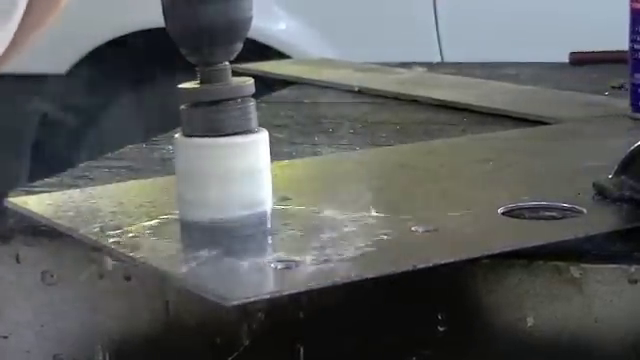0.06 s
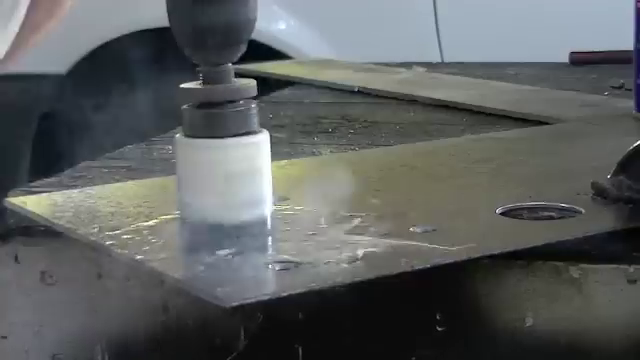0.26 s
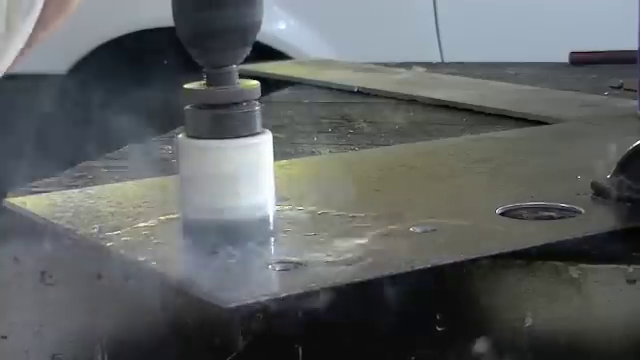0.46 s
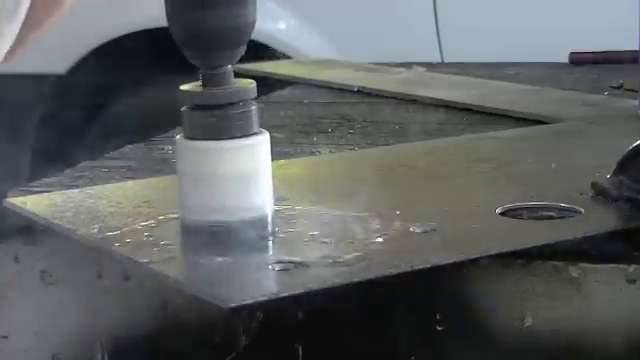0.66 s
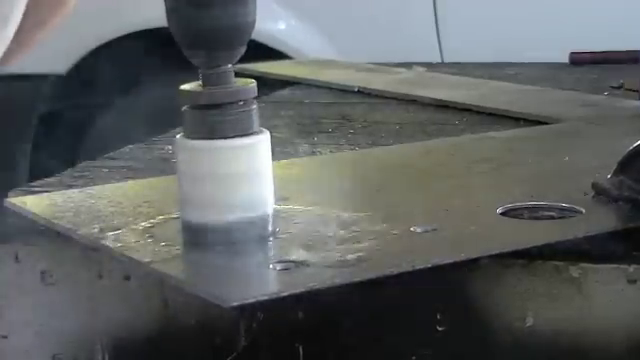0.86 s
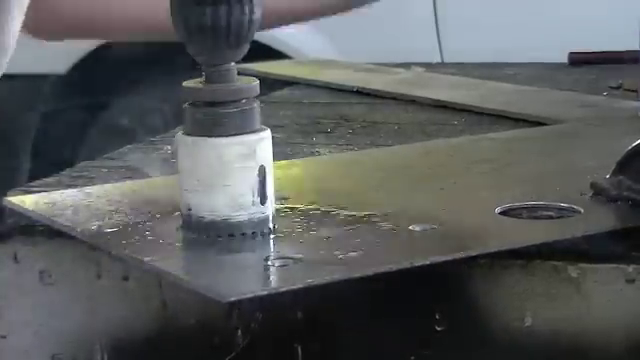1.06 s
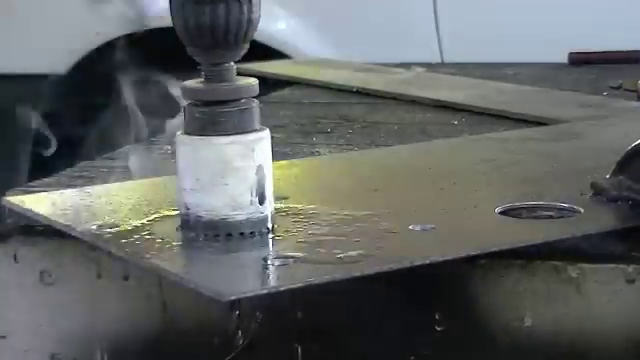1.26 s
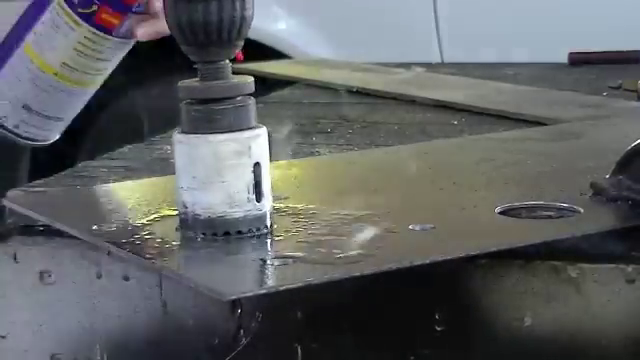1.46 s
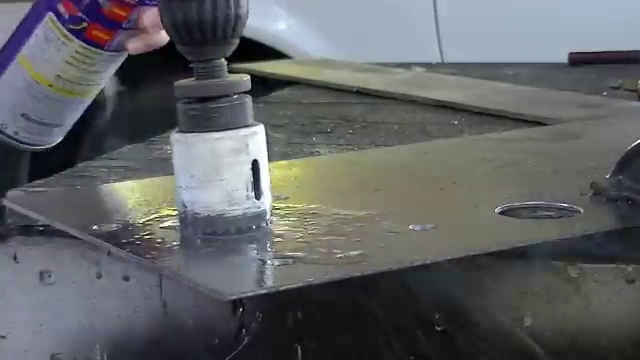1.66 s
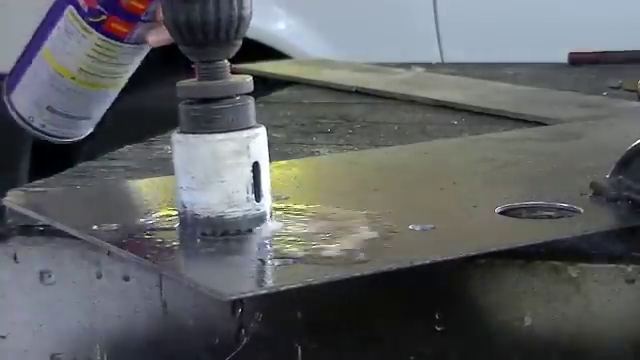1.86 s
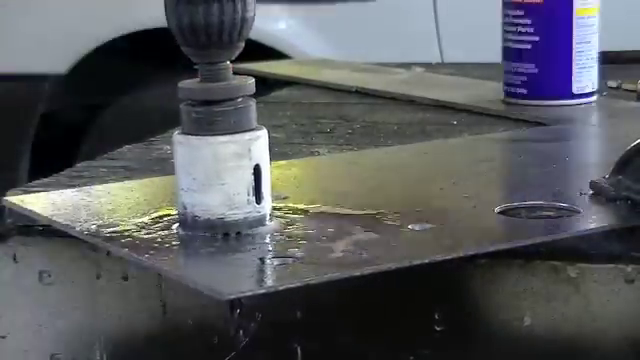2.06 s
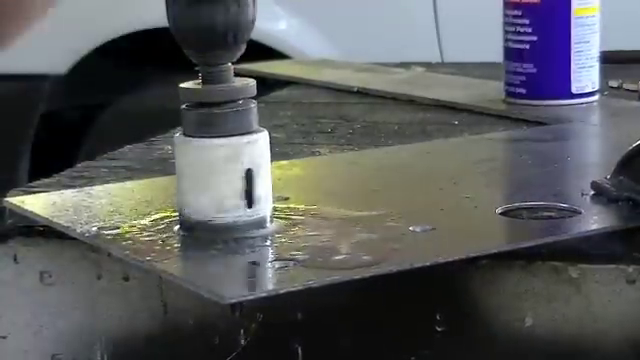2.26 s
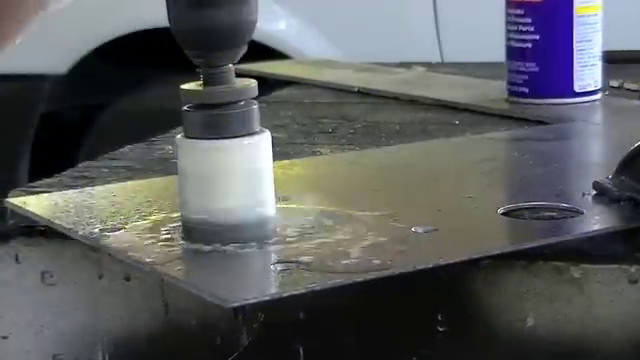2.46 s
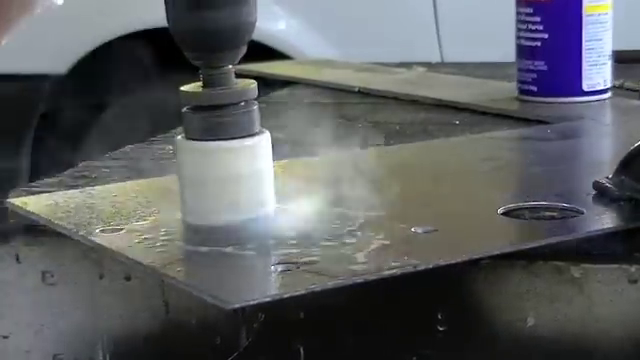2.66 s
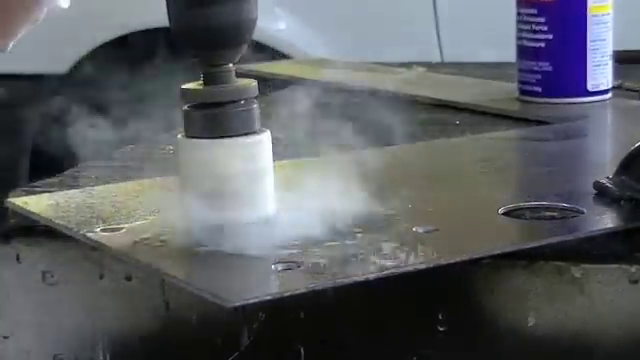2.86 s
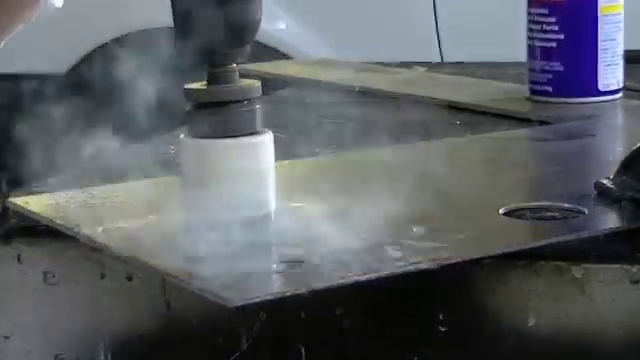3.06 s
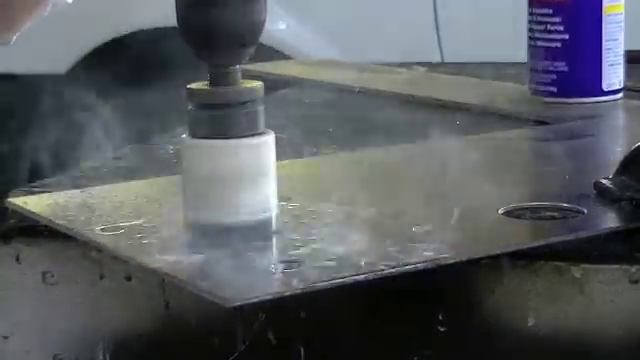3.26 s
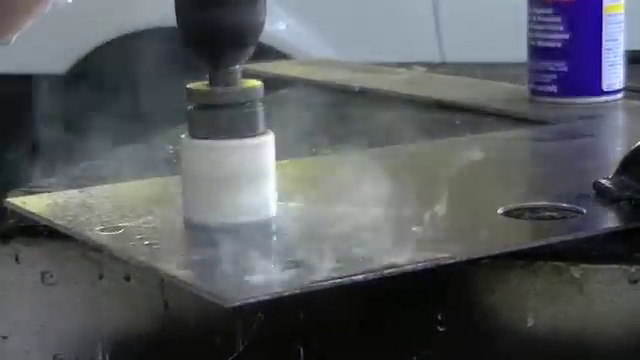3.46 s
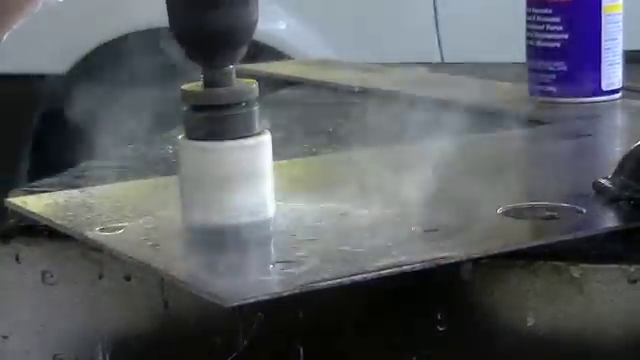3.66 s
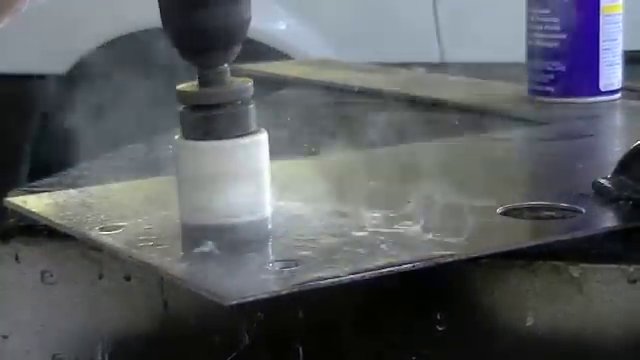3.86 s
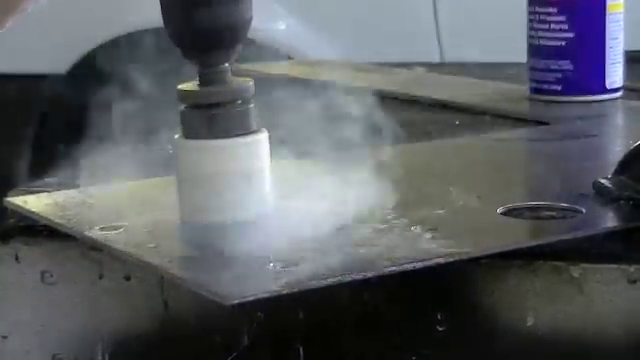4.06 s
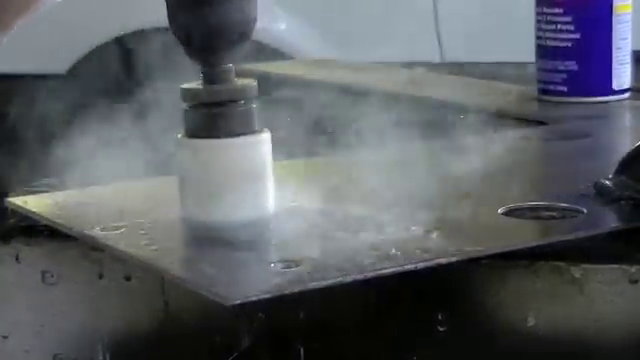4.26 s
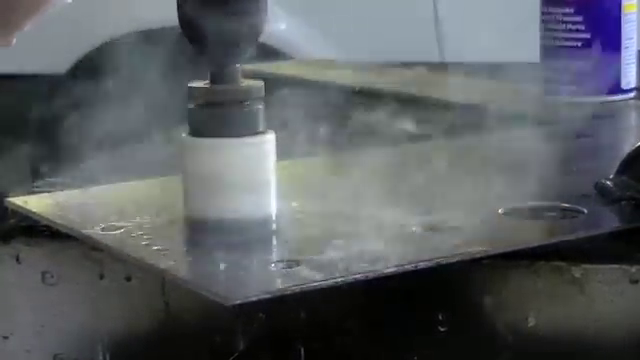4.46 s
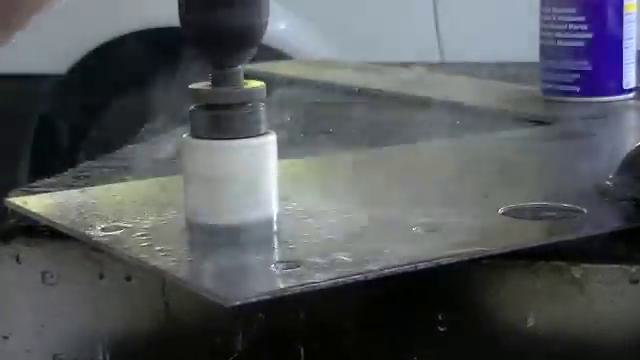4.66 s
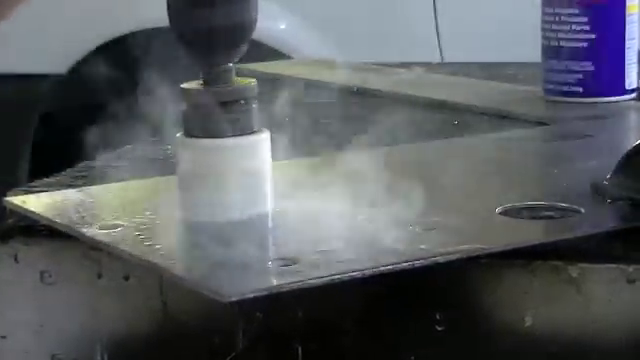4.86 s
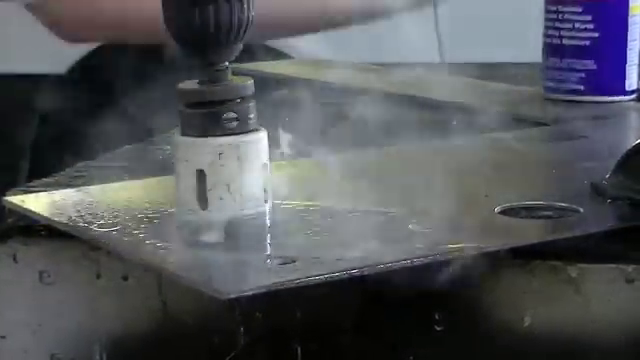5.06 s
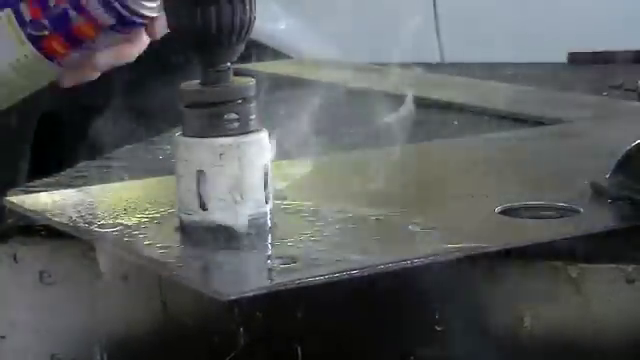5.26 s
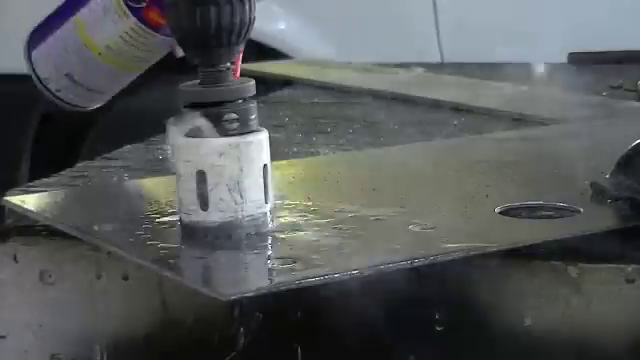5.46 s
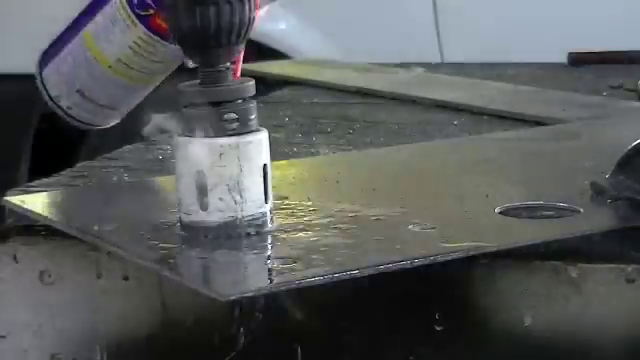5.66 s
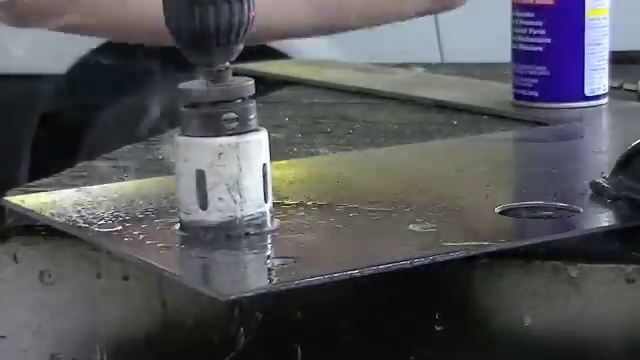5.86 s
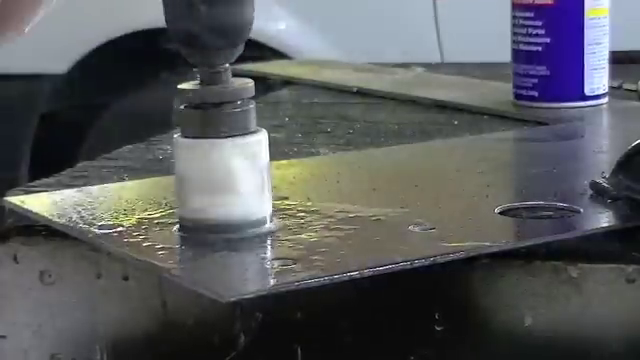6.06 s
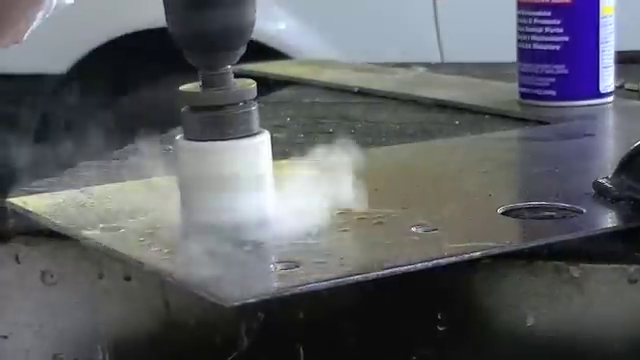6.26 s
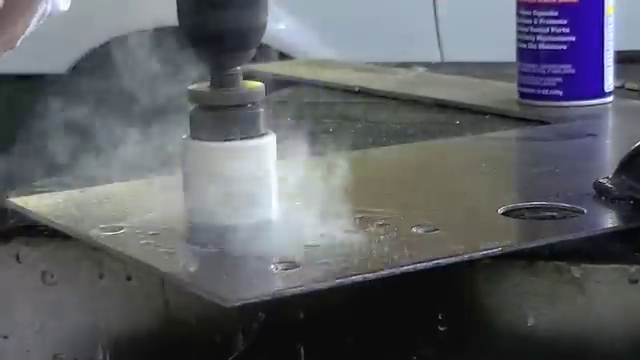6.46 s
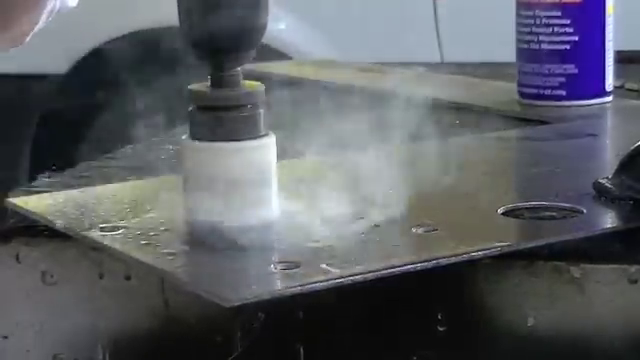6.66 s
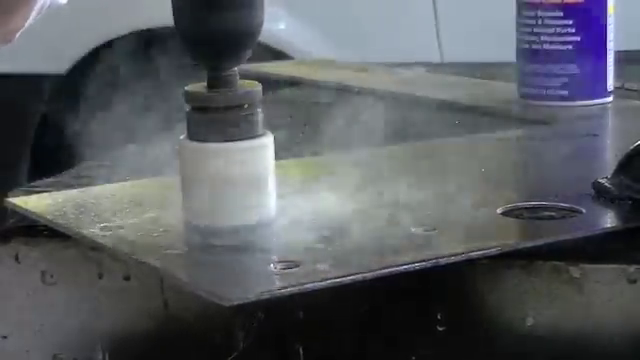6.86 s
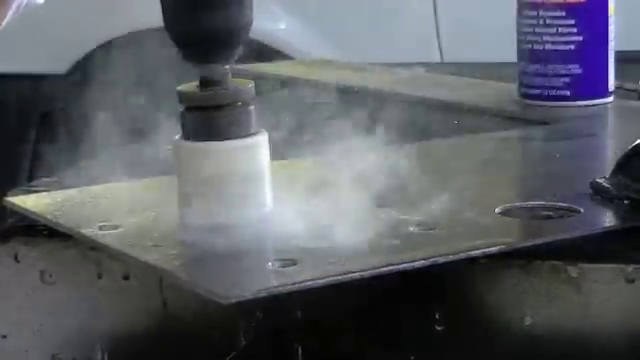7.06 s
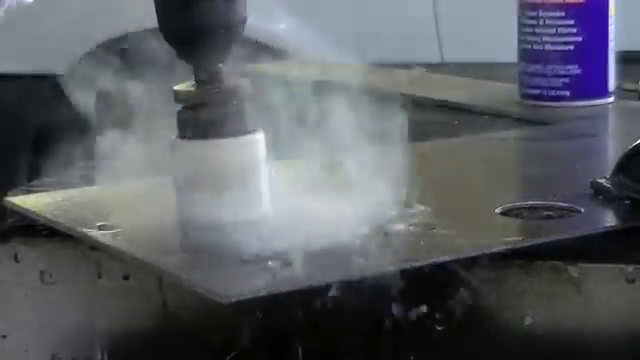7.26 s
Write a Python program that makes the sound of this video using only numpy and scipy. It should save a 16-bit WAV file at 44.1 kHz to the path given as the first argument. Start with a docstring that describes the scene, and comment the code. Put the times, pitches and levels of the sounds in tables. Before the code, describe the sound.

Close up in a workshop, a drill-driven hole saw grinds a steel plate with harsh, shrill, uneven chatter. It stops after a second; a can clacks, spray hisses and oil spits faintly, a distant motor whines upward. A sharp clank, then a longer cutting burst. Another pause with spray and a hard clack, then cutting resumes to the end. Automatic level control lifts the background in the gaps.

```python
"""Three bursts of harsh chatter: a hand drill drives a hole saw into a steel plate.
Uneven tooth strikes, faster or slower with the load, ring the resonances of cup and plate.
In the pauses a spray can is handled and set down (noise bursts with decaying modes) and hisses (gated noise).
Behind lie shop air, a machine's hum and a brief motor whine (noise and sines);
they come up in the pauses because a gain control lets go."""
import sys
import numpy as np
from scipy import signal
from scipy.fft import rfft, irfft, next_fast_len
from scipy.io import wavfile
from scipy.ndimage import uniform_filter1d, map_coordinates

SR = 44100
rng = np.random.default_rng(int(sys.argv[2]) if len(sys.argv) > 2 else 0)


def unload_audio(sound):
    """Save the sound as a 16-bit wav file, at the path given as the first command line argument."""
    columns = np.transpose(np.atleast_2d(sound))
    # keep every value between -1 and 1, then stretch to whole-number steps
    steps = np.round(np.clip(columns, -1, 1) * 32767)
    wavfile.write(sys.argv[1], SR, steps.astype(np.int16))


N = 321930


def saw():
    """Unevenly spaced tooth strikes ring the steel: dark below the strike rate, noise above its first multiples."""
    # Saw cup and plate resonances. Each row: centre in Hz, width in Hz, relative level in dB.
    steel_modes = [(1240, 60, -12), (1700, 26, -1), (2070, 68, -6), (2400, 83, -12), (3410, 140, -2),
                   (3930, 130, -3), (4840, 80, 0), (5070, 60, -1), (5770, 110, -4), (6560, 120, -3),
                   (7020, 50, -2), (7400, 120, -1), (7620, 67, -3), (8140, 94, -3), (8800, 130, -1),
                   (9140, 120, -4), (9400, 150, -4), (9980, 200, -5), (10500, 110, -5), (11110, 90, -2),
                   (11810, 60, -4), (12400, 110, -5), (13140, 150, -5), (13850, 130, -5), (14500, 600, -7),
                   (15300, 900, -5)]
    # The plate's many small modes, blurred. Each row: frequency in Hz, relative level in dB.
    plate_blur = [(60, -67), (300, -37), (700, -17.5), (1400, -13.5), (2200, -14), (3000, -9), (5000, -3),
                  (8000, -3), (12000, -4.5), (14300, -14), (15700, -33)]
    rate_hz, level_db, throb_db = cut()
    strikes = tooth_strikes(rate_hz, level_db, throb_db)

    def steel(hz):
        cup_power = sum(amp(db + 2.0) ** 2 / (1 + (2 * (hz - c) / w) ** 2) for c, w, db in steel_modes)
        plate_power = amp(along(plate_blur, hz)) ** 2
        return causal(np.sqrt(cup_power + plate_power)) * spread(hz)

    ring = filtered(strikes, steel)
    # the turning cup and deepening cut keep changing which modes are driven
    ring = shifting(ring, depth_db=3.0)
    power = uniform_filter1d(uniform_filter1d(ring ** 2, size=4000), size=4000)
    loudness = np.sqrt(np.abs(power) + 1e-9)
    return amp(level_db) * ring / loudness


def cut():
    """Strike rate, level and throb of the saw; the level falls after a burst and rises again at the next bite."""
    # Three bursts, from the bite of the teeth to standstill. Each row: time in seconds,
    # tooth strikes per second, level in dB ahead of the gain control, throb scale in dB.
    cut_bursts = [
        [(0, 3160, 13, 6), (.17, 2970, 9.5, 9.5), (.4, 2170, 8, 10.5), (.5, 3280, 7, 8.5), (.62, 3160, 5, 6.5),
         (.8, 2800, 8.5, 9), (.95, 2240, 9, 6), (1.0, 2400, 6.5, 3.5), (1.04, 2070, -3.5, 4)],
        [(2.35, 1440, 4.5, 8), (2.4, 1830, 7.5, 2), (2.435, 2350, 14.5, 6.5), (2.47, 2460, 20.5, 9),
         (2.49, 1940, 18.5, 8.5), (2.68, 2400, 10.5, 7), (2.78, 2200, 12, 3.5), (2.91, 1740, 12, 3),
         (3.03, 2020, 11.5, 3.5), (3.18, 2750, 12.5, 9), (3.35, 3590, 6.5, 8), (3.57, 3460, 5, 8),
         (3.73, 2150, 4.5, 9), (3.95, 2660, 5, 10), (4.1, 1850, 8.5, 8), (4.3, 1680, 11, 5.5),
         (4.37, 1700, 9.5, 1.5), (4.46, 3100, 8.5, 9.5), (4.78, 3730, 5, 8), (4.91, 1850, 5.5, 7),
         (5.02, 950, 0.5, 5), (5.11, 770, -6.5, 3.5)],
        [(6.13, 1600, 10, 7), (6.18, 1890, 14, 4), (6.4, 2050, 14.5, 3.5), (6.48, 3520, 12.5, 8),
         (6.6, 3990, 13, 5), (6.86, 3640, 12, 6), (6.96, 2840, 10.5, 7.5), (7.2, 1750, 15, 7),
         (7.3, 1550, 12.5, 7)],
    ]
    bite_db_per_s, fade_db_per_s = 1905, 503
    t = np.arange(N) / SR
    rate_hz, level_db, throb_db = curves(sum(cut_bursts, []))
    quiet_db = []
    for rows in cut_bursts:
        before_s = np.maximum(rows[0][0] - t, 0)
        after_s = np.maximum(t - rows[-1][0], 0)
        quiet_db.append(bite_db_per_s * before_s + fade_db_per_s * after_s)
    return rate_hz, level_db - np.min(quiet_db, axis=0), throb_db


def tooth_strikes(rate_hz, level_db, throb_db):
    """Impulses at drifting, scattered times, their force throbbing as the saw runs out of true."""
    throb_hz = 52
    uneven_firm, uneven_per_db, firm_db = .13, .004, 8.5  # spacing is less even below a firm cut's level
    uneven = np.clip(uneven_firm + uneven_per_db * np.maximum(firm_db - level_db, 0), 0, .4)
    count = np.cumsum(rate_hz) / SR
    chance = rng.standard_normal((N // 5, 3))
    tooth = np.arange(len(chance))
    scatter = np.interp(tooth, count, uneven)
    shake_db = np.interp(tooth, count, throb_db)
    # the beat drifts, more so while the saw throbs, and each tooth also lands early or late against it
    drift = uniform_filter1d(chance[:, 0], size=3)  # the cup's mass spreads each change over a few teeth
    beat = np.cumsum(1 + .55 * amp(1.3 * shake_db) * scatter * drift)
    beat = beat + 0.62 * scatter * chance[:, 2]
    at = np.interp(beat, count, np.arange(N))
    # once a turn the high tooth bites hard, then the force fades
    turn = (np.cumsum(throb_hz * (1 + 0.044 * wobble(20))) / SR) % 1
    throb = throb_db * (.8 + 0.25 * wobble(45)) * (np.exp(-2.5 * turn) - .37)
    force = amp(throb + .8 * wobble(6))
    force = uniform_filter1d(force, size=90)  # the bite takes two milliseconds
    size = np.interp(at, np.arange(N), force) * amp(.35 * chance[:, 1])
    size = size * (beat < count[-1])
    # windowed sinc places each strike between samples
    taps = np.floor(at)[:, None] + np.arange(-7, 9)
    offset = taps - at[:, None]
    shape = np.sinc(offset) * np.cos(np.pi * offset / 18) ** 2
    index = np.clip(taps, 0, N - 1).astype(int)
    return np.bincount(index.ravel(), (size[:, None] * shape).ravel(), N)


def spread(hz):
    """Bending waves cross the plate on many paths: each band gets its own lag, smeared without colouring."""
    longest_lag_s, band_hz = .006, 150
    lag_s = longest_lag_s * np.interp(hz / band_hz, np.arange(400), rng.random(400))
    return np.exp(-2j * np.pi * np.cumsum(lag_s) * hz[1])


def shifting(x, depth_db):
    """x under patches of random gain that drift in time and frequency."""
    z = signal.stft(x, nperseg=512)[2]
    field = uniform_filter1d(rng.standard_normal(z.shape), size=2, axis=0)
    field = uniform_filter1d(field, size=30, axis=1)
    return signal.istft(z * amp(depth_db * unit(field)), nperseg=512)[1][:N]


def clacks():
    """Can and metal clacks: a bright burst dies away while the can's modes ring on."""
    # Each row: start in seconds, relative burst level in dB, burst t60 in seconds,
    # brightness in dB per octave, body ring level in dB, base ring level in dB.
    clack_rows = [(1.1561, -33, 0.41, -6.5, -56, -43), (1.2067, -17.5, 0.097, -0.5, -40, -36),
                  (1.2494, -35, 0.22, 1, -60, -50), (1.3219, -17, 0.11, 0, -62, -37),
                  (2.057, -26, 0.074, 6, -57, -57), (2.1026, -8, 0.17, -1, -31, -25),
                  (2.1615, -15, 0.031, -2.5, -34.5, -50), (2.2186, -31.5, 0.13, -2.5, -54, -60),
                  (2.2777, -24, 0.12, 1, -52, -58), (5.1548, -21, 0.12, -7.5, -32.5, -33),
                  (5.8988, -3.5, 0.11, -1.3, -35, -29), (6.0406, -20.5, 0.095, -5, -54, -62)]
    # The can's modes: those struck with the burst, then body, then base.
    # Each row: frequency in Hz, relative level in dB, t60 in seconds (struck modes also fade with the burst).
    struck_modes = [(1800, -2, 0.17), (4140, -7.5, 0.22), (4700, 4, 0.031), (5850, 7.5, 0.035),
                    (7340, -1, 0.16), (7840, 3, 0.1), (11300, -25, 0.081)]
    body_modes = [(650, 3, .15), (710, -2, .06)]
    base_modes = [(1172, 0, .09), (1250, 0, .15)]
    out = np.zeros(N + SR)
    t = np.arange(SR // 4) / SR
    hz = np.fft.rfftfreq(len(t), 1 / SR)

    def ring(modes):
        return sum(amp(db + rng.normal(0, 3) - 60 * t / t60_s) * np.sin(2 * np.pi * f * t)
                   for f, db, t60_s in modes)

    for start_s, db, t60_s, tilt_db, body_db, base_db in clack_rows:
        t60_s = max(t60_s, .01)
        colour = amp(tilt_db * np.log2((hz + 1) / 5000)) / (1 + (1300 / (hz + 1)) ** 4)
        burst = unit(irfft(rfft(rng.standard_normal(len(t))) * colour, len(t)))
        burst = burst * (amp(-60 * t / t60_s) + 0.53 * amp(-60 * t / 0.011))
        struck = ring(struck_modes) * amp(-30 * t / t60_s)
        hit = amp(db) * (0.6 * burst + 0.14 * struck)
        hit = hit + amp(body_db) * ring(body_modes) + amp(base_db) * ring(base_modes)
        out[round(start_s * SR):][:len(t)] += hit * (1 - np.exp(-t / 0.0012))
    return smear(out[:N], t60_s=0.72, wet_db=-36)


def spray():
    """Nozzle hiss in puffs and longer faint squirts; oil spitting on the hot saw is grainy treble noise."""
    # Nozzle openings and oil spits. Each row: start in seconds, level in dB, length in seconds.
    nozzle = [(1.438, -30.5, 0.0057), (1.4625, -19, 0.012), (1.586, -41, 0.38), (2.038, -31.5, .015),
              (5.318, -43, 0.21), (5.712, -41.5, 0.025), (6.082, -32, 0.012)]
    spits = [(1.598, -40, 0.038), (1.672, -36.5, 0.026), (1.71, -45, 0.025), (1.787, -39, 0.014),
             (1.918, -43.5, 0.013), (5.314, -43, 0.015), (5.41, -42, 0.02), (5.482, -38.5, 0.012)]
    # Spectra of nozzle and oil. Each row: frequency in Hz, relative level in dB.
    hiss = [(300, -39), (2000, -9), (5000, -6), (9000, -5), (15000, -4)]
    sizzle = [(300, -70), (3000, -59), (5200, -21), (6600, -16.5), (8000, -20.5), (11000, -31)]
    grains = unit(noise(sizzle) * amp(0.86 * wobble(140)))
    return bursts(nozzle, t60_s=0.095) * noise(hiss) + bursts(spits, t60_s=0.13) * grains


def bursts(rows, t60_s):
    """Gain of sudden, held and fading bursts."""
    t = np.arange(N) / SR
    gain = 0
    for start_s, db, length_s in rows:
        fade_db = 60 * np.maximum(t - start_s - length_s, 0) / t60_s
        gain = gain + amp(db - fade_db) * np.clip((t - start_s) / 0.0018 + 1, 0, 1)
    return gain


def workshop():
    """Near-steady air noise, an idling machine's unsteady harmonics and a passing whine; the air has some width."""
    # Workshop air. Each row: time in seconds, level in dB.
    shop_level = [(1.2, -43), (2.3, -41.5), (5.4, -42), (5.75, -39.5), (6.0, -41.5)]
    # Air spectrum. Each row: frequency in Hz, relative level in dB.
    air_spectrum = [(30, -29), (110, -17), (170, -11), (300, -7), (460, -4), (700, -4), (1300, -8),
                    (1900, -11.5), (4400, -14.5), (8000, -20.5), (15500, -29.5)]
    # A machine idling. Each row: multiple of hum_hz, level in dB.
    hum_tones = [(7, -61), (8, -59), (9, -59.5), (11, -49.5), (12, -59.5), (16, -61)]
    hum_hz = 43.13
    # A far motor winds up and sags. Each row: time in seconds, frequency in Hz, level in dB.
    whine_path = [(1.12, 425, -60), (1.45, 510, -48.5), (1.87, 593, -48), (2.02, 560, -70)]
    t = np.arange(N) / SR
    air_db, = curves(shop_level)
    air = amp(air_db + wobble(8)) * noise(air_spectrum)
    hum = 0
    for k, db in hum_tones:
        level = amp(db + 0.46 * wobble(54)) * np.sqrt(2)
        hum = hum + level * np.sin(2 * np.pi * k * hum_hz * t + 1.46 * wobble(11))
    whine_hz, whine_db = curves(whine_path)
    whine_db[(t < whine_path[0][0]) | (t > whine_path[-1][0])] = -120
    whine_phase = 2 * np.pi * np.cumsum(whine_hz) / SR
    whine = amp(whine_db + 2.3 * wobble(9.7)) * np.sqrt(2) * np.sin(whine_phase)
    side = amp(air_db - 28.0) * noise([(60, -10), (400, 2), (1000, -10), (3000, -22)])
    return air + hum + whine + np.array([side, -side])


def amp(db):
    """dB to gain."""
    return 10 ** (np.asarray(db) / 20)


def unit(x):
    """Scaled to rms 1."""
    return x / np.sqrt(np.mean(x ** 2) + 1e-20)


def along(points, hz):
    """(Hz, value) points interpolated on a log axis."""
    f, v = np.transpose(points)
    return np.interp(np.log(hz + 1), np.log(f + 1), v)


def curves(rows):
    """One value per sample for each column after the time."""
    s, *cols = np.transpose(rows)
    return [np.interp(np.arange(N) / SR, s, c) for c in cols]


def wobble(rate_hz):
    """A smooth random curve with rate_hz knots a second."""
    knots = rng.standard_normal(int(N * rate_hz / SR) + 4)
    return map_coordinates(knots, [np.arange(N) * rate_hz / SR])


def filtered(x, response):
    """x times a complex response of frequency."""
    m = next_fast_len(N + SR // 2)
    return irfft(rfft(x, m) * response(np.fft.rfftfreq(m, 1 / SR)), m)[..., :N]


def causal(gain):
    """The complex response that rings after, not before, with this gain on an rfft grid (minimum phase)."""
    cepstrum = irfft(np.log(gain + 1e-6))
    half = len(cepstrum) // 2
    cepstrum[1:half] *= 2
    cepstrum[half + 1:] = 0
    return np.exp(rfft(cepstrum))


def noise(spectrum):
    """Coloured noise of rms 1."""
    return unit(filtered(rng.standard_normal(N), lambda hz: amp(along(spectrum, hz))))


def smear(x, t60_s, wet_db):
    """x with a short diffuse tail."""
    t = np.arange(SR // 4) / SR
    tail = rng.standard_normal(len(t)) * amp(-60 * t / t60_s)
    return x + amp(wet_db) * signal.fftconvolve(x, tail / np.linalg.norm(tail))[:N]


def scene():
    """Sum of all sources on two channels, centred except for the width of the air."""
    return saw() + clacks() + spray() + workshop()


def record(dry):
    """Gain control on recent power, soft overload, bass cut, a faint lumpy rumble, band limit."""
    knee_db, top_hz = -22, 17087
    power = np.mean(dry ** 2, axis=0)
    keep = np.exp(-1 / (0.025 * SR))  # 25 ms memory
    recent = signal.lfilter([1 - keep], [1, -keep], power, zi=[np.mean(power[:900])])[0]
    over_db = np.maximum(10 * np.log10(recent + 1e-12) - knee_db, 0)
    wet = dry * amp(-.8 * over_db)
    wet = wet / (1 + np.abs(wet / .85) ** 4) ** .25
    wet = filtered(wet, lambda hz: 1 / (1 + (140 / (hz + 1)) ** 4))
    wet = wet + amp(-79 + 6 * wobble(25)) * noise([(20, 0), (100, -4), (200, -14), (600, -40)])
    return filtered(wet, lambda hz: np.where(hz < 15750, 1, amp(-45)) * (hz < top_hz))


dry = scene()
out = record(dry)
unload_audio(out)
```